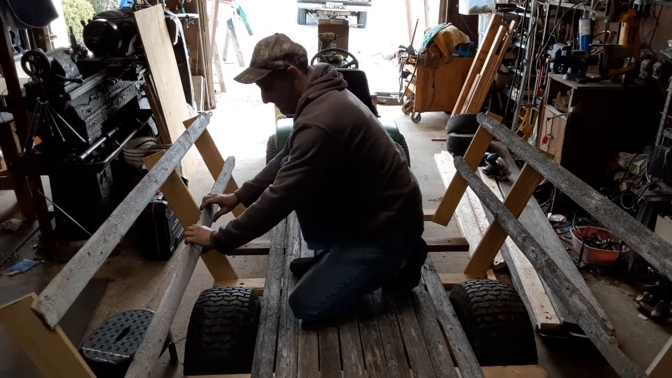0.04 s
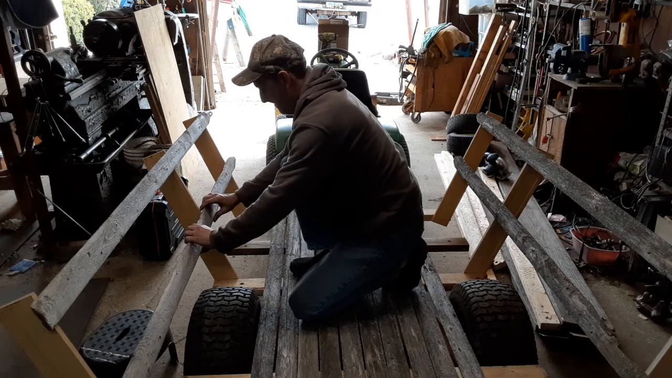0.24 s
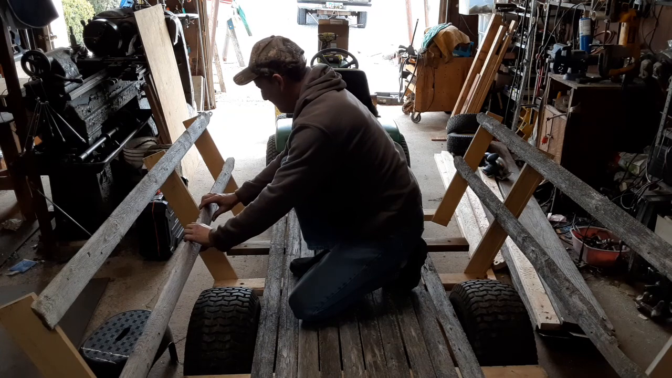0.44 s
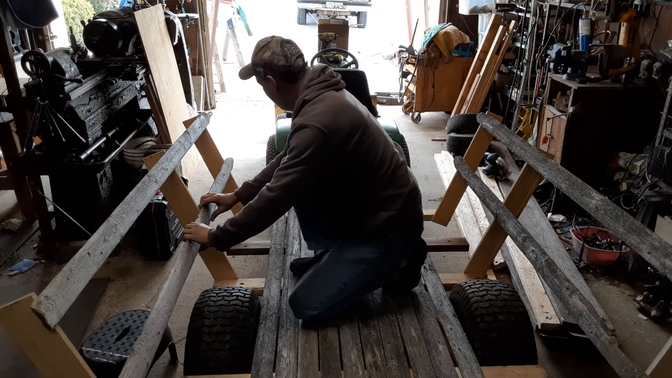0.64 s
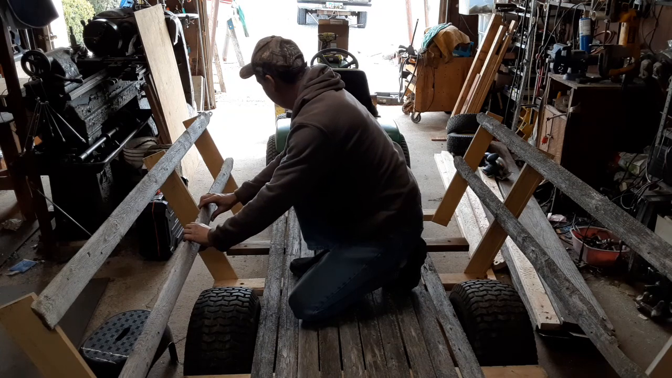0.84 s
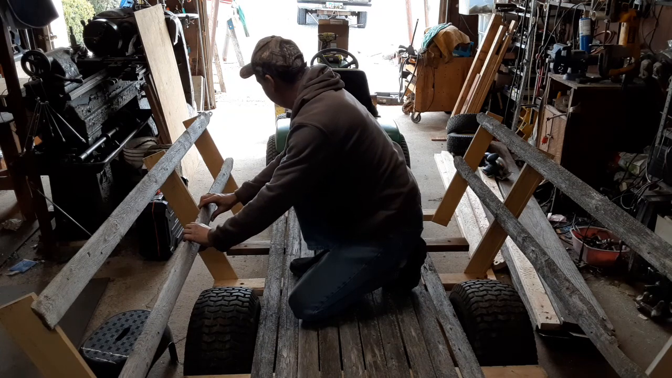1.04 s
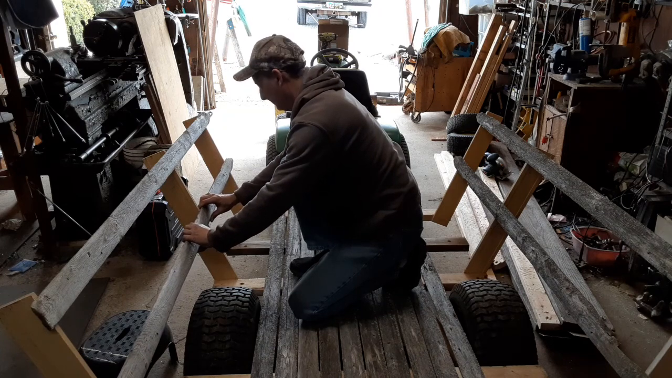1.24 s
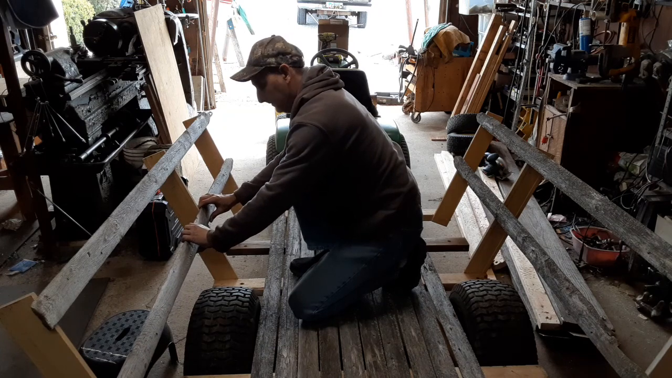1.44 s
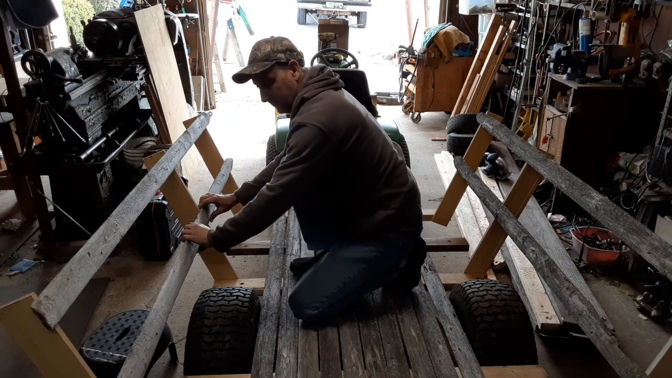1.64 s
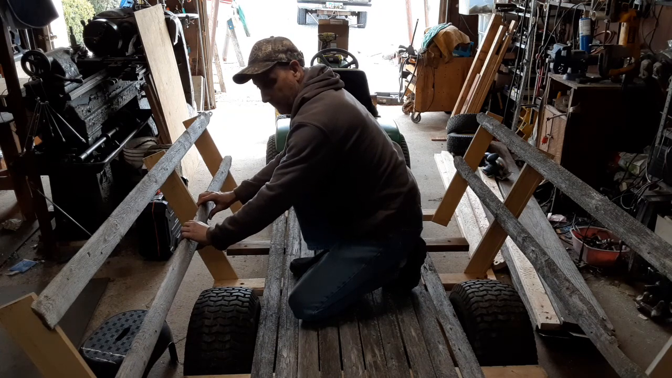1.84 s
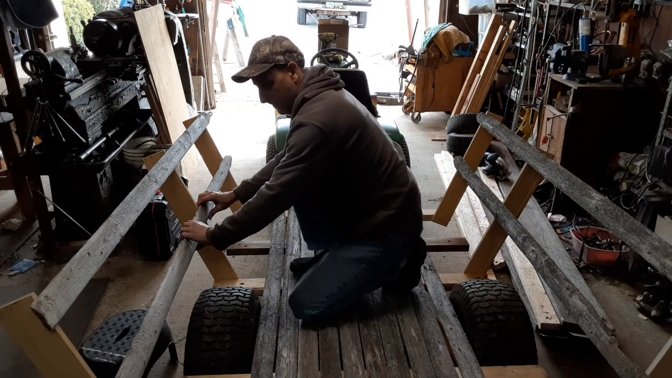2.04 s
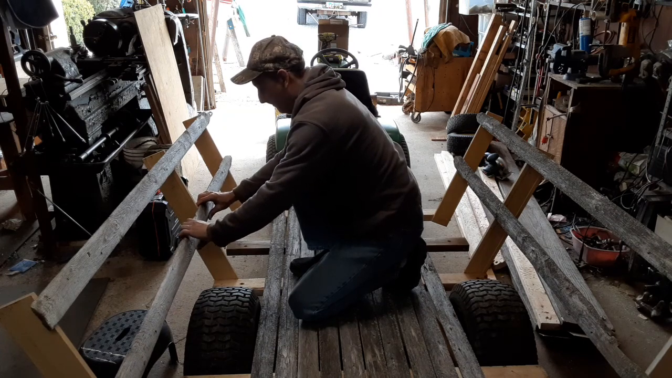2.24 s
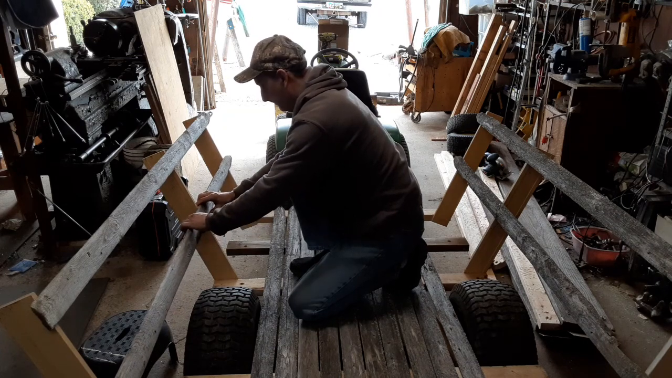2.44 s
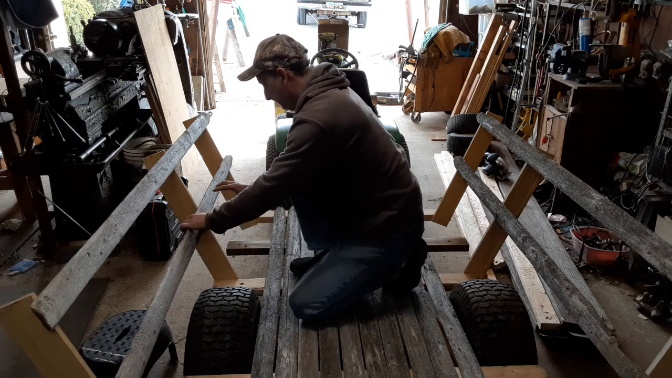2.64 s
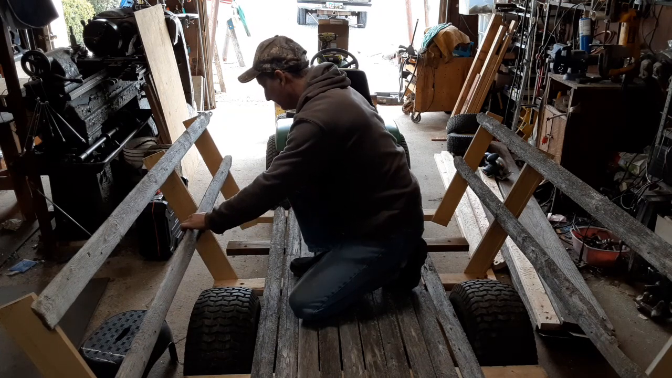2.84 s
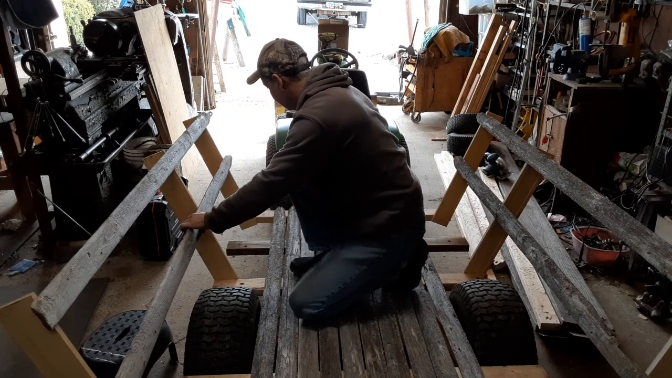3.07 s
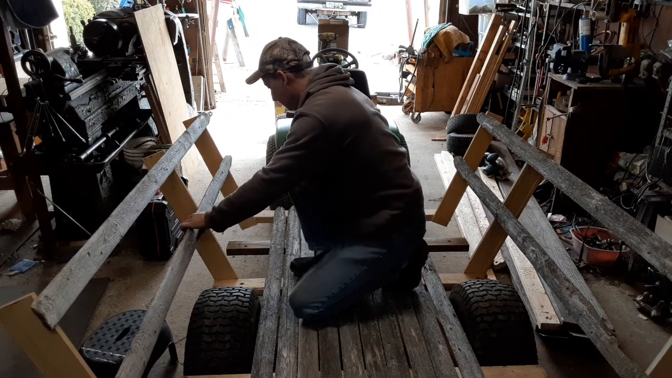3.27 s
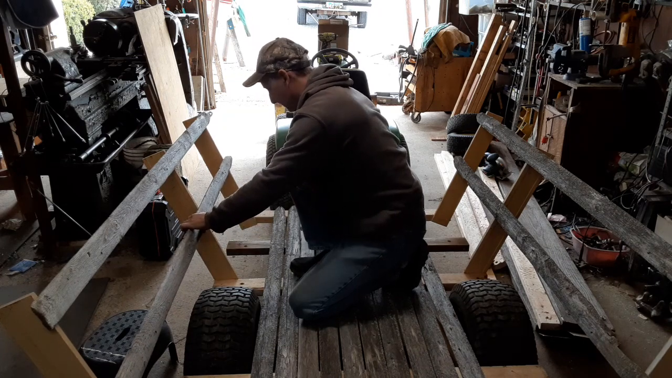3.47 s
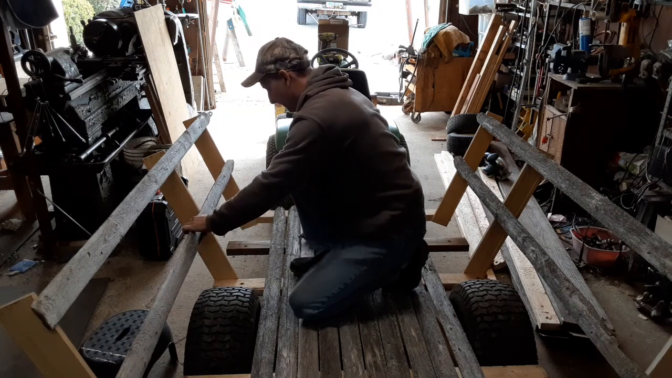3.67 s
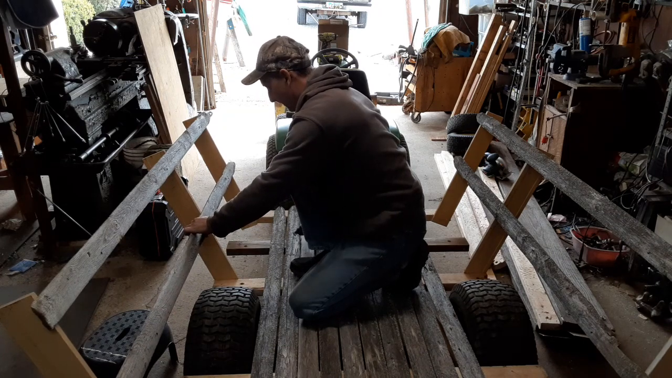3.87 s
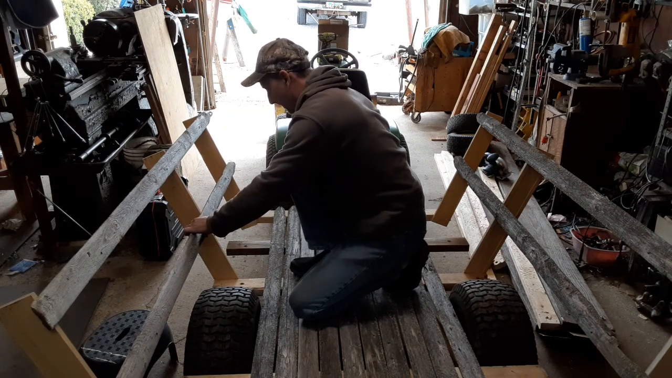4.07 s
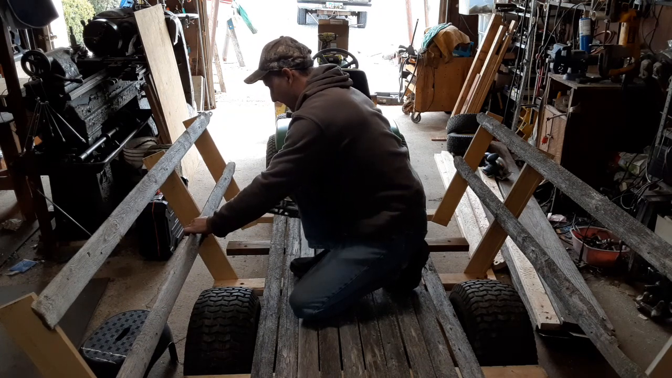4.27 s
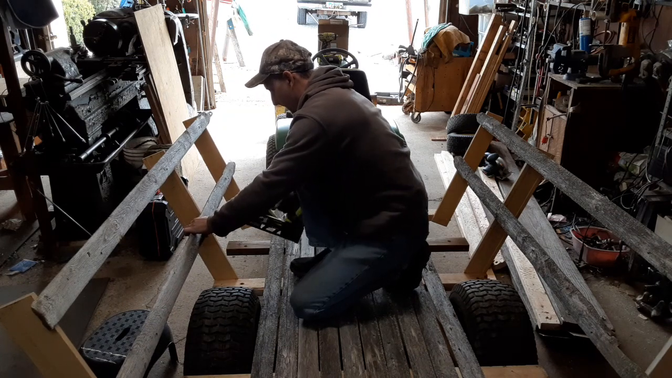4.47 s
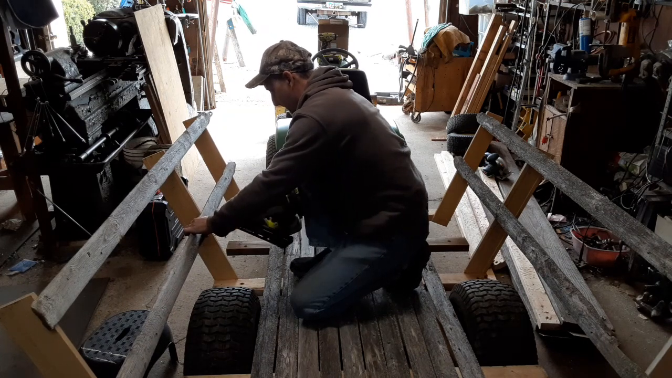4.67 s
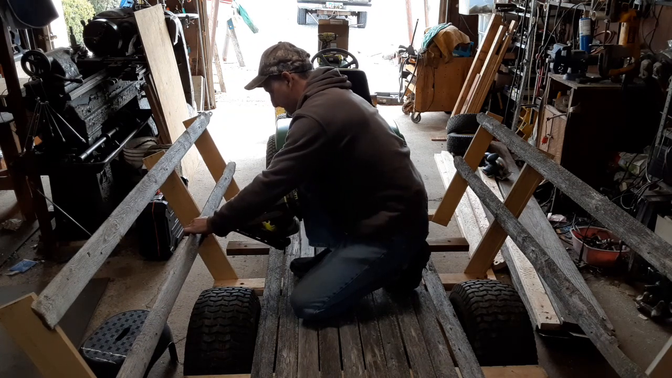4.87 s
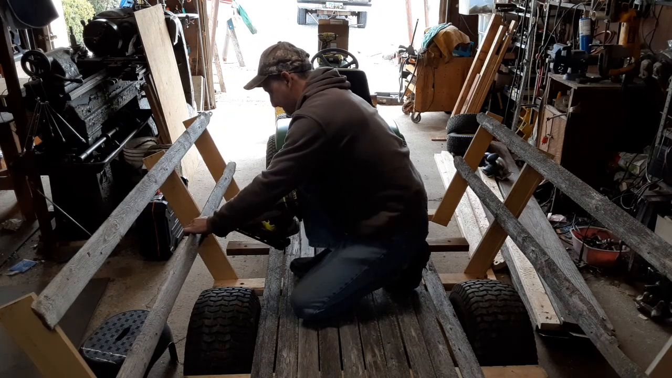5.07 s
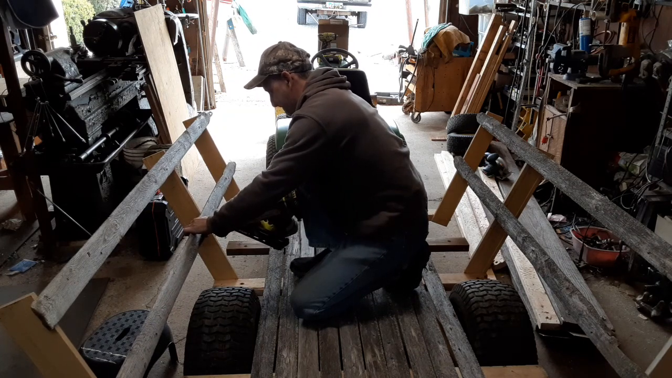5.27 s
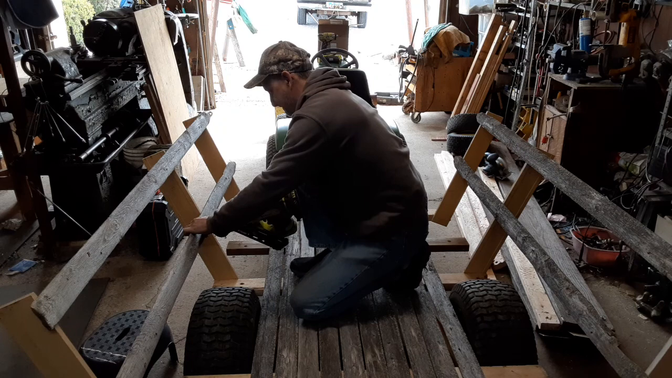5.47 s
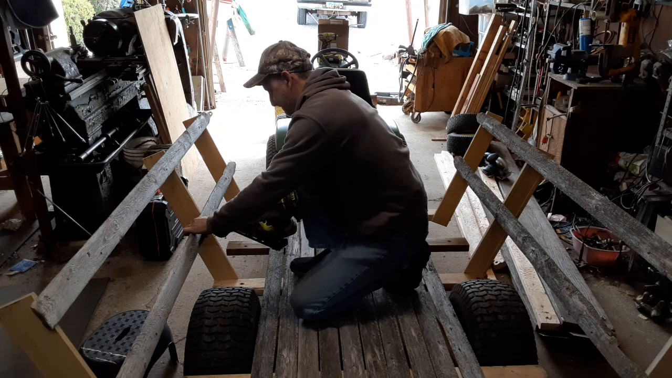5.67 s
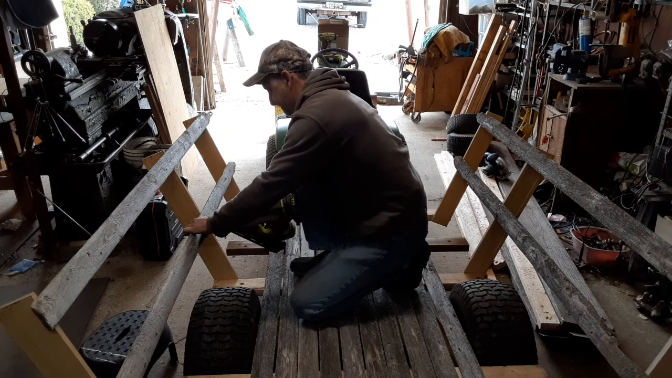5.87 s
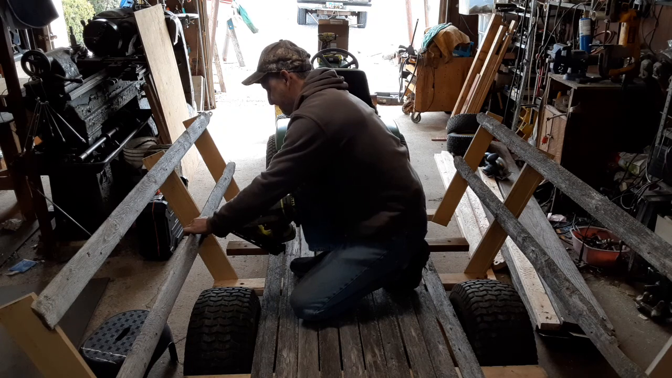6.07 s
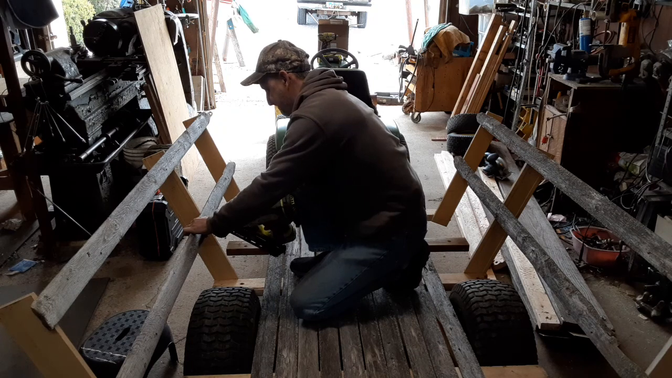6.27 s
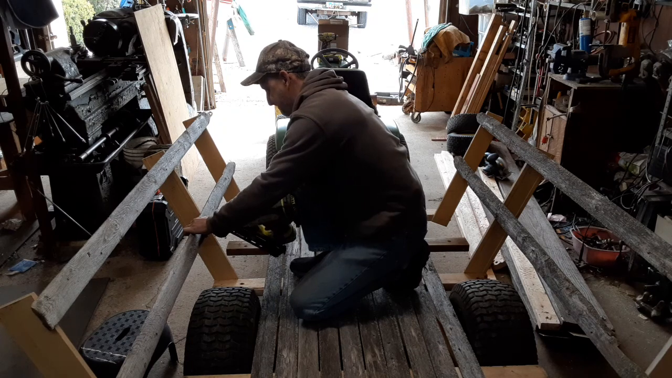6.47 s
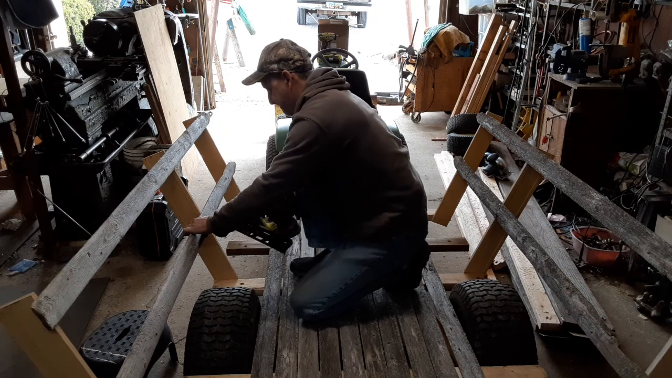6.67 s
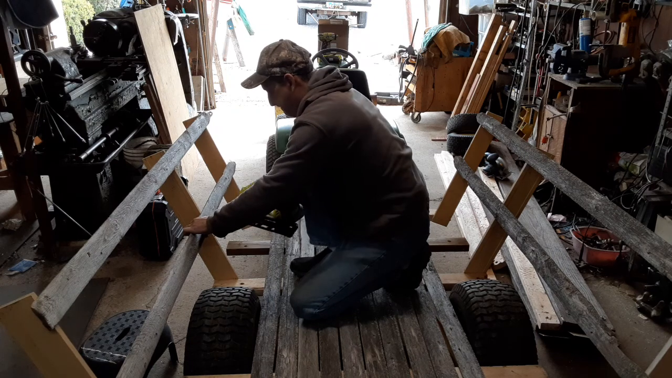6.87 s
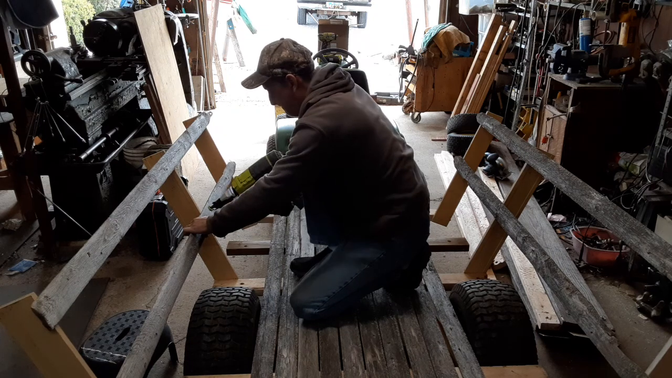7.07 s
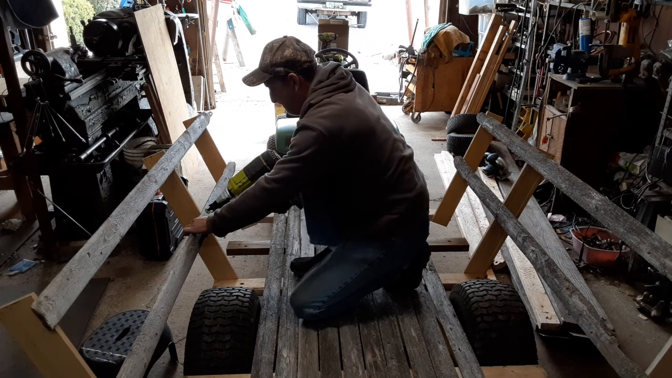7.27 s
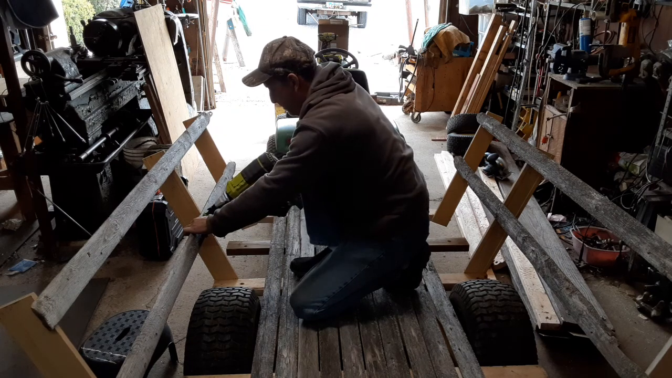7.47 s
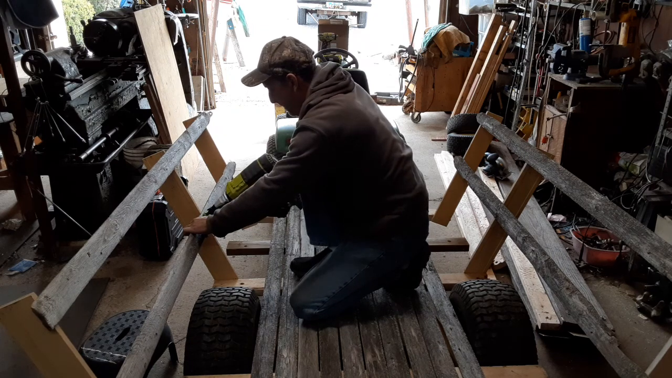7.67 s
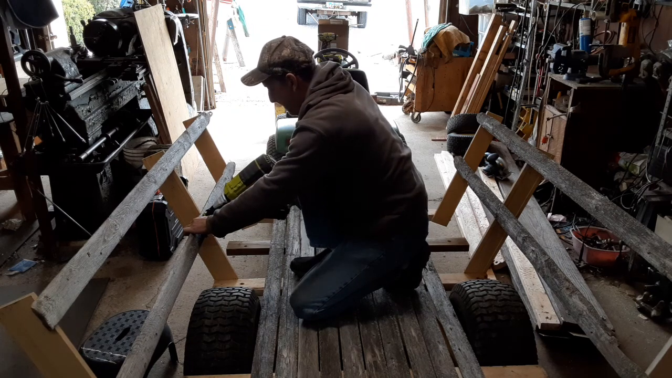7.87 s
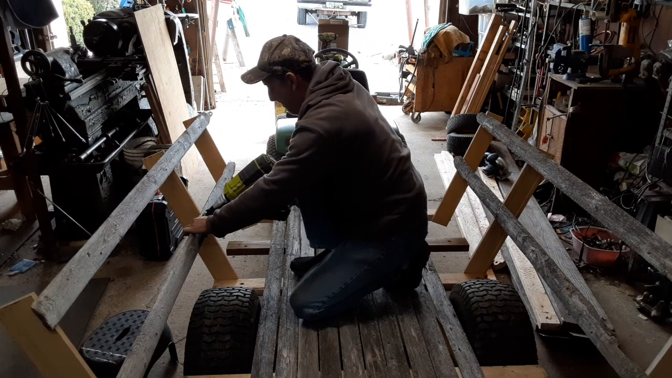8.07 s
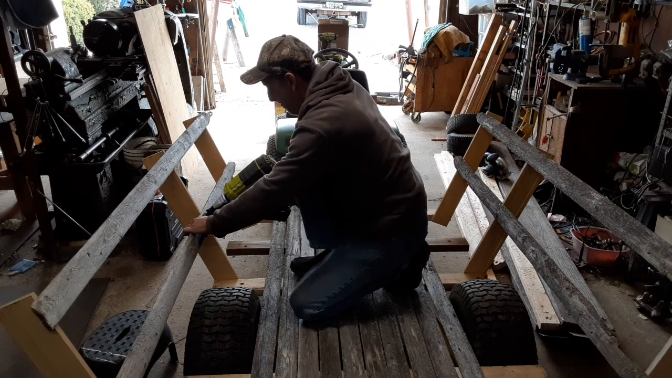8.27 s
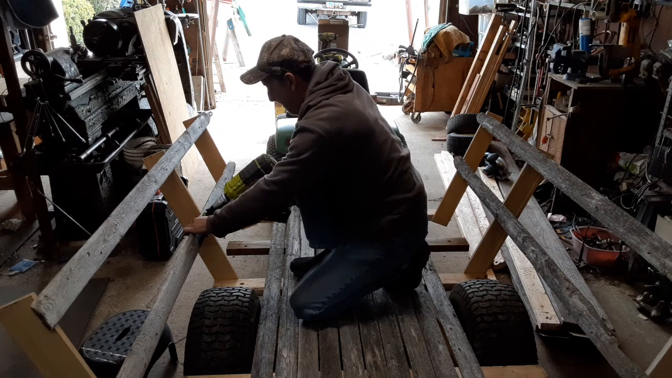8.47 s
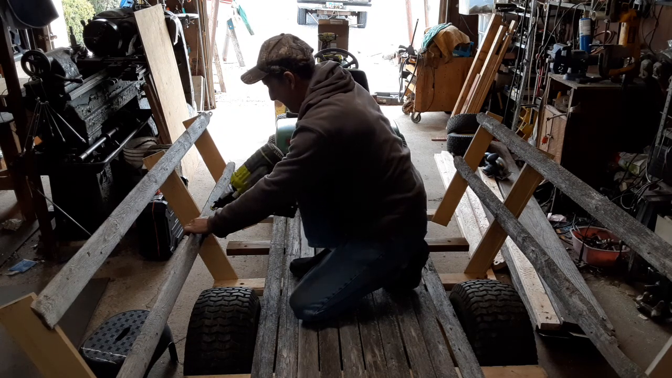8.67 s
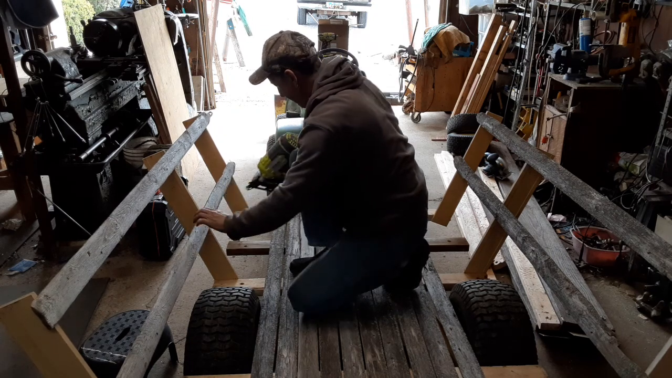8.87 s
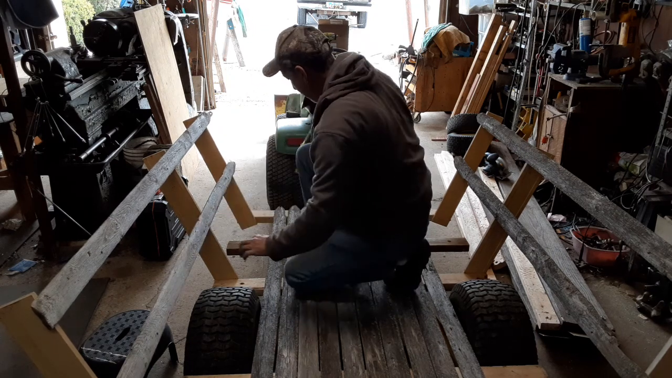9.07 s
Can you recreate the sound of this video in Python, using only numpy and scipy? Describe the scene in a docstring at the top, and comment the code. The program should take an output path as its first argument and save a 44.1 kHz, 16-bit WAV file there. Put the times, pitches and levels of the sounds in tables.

```python
"""A cordless nailer drives two brads: trigger clicks, motor wind-up, release, bang, return stroke and stop.
Modes of steel, boards and deck ring as decaying sines; cracks, clatter and gears are shaped noise and tones.
Before and between the shots a man kneeling on a wooden trailer deck in a garage shifts about: his clothes
rustle as swelling noise, and one bouncing bump knocks the deck. A low rumble lies beneath.
A gain control yields quickly to loud sound and is slow to come back."""
import sys
import numpy as np
from scipy import signal
from scipy.fft import rfft, irfft, next_fast_len
from scipy.io import wavfile
from scipy.ndimage import uniform_filter1d

SR = 44100
rng = np.random.default_rng(int(sys.argv[2]) if len(sys.argv) > 2 else 0)


def output_pcm(signal):
    """Save a mono or channel-first signal as 16-bit PCM at the path in sys.argv[1].

    Samples are clipped to [-1, 1] before scaling.
    """
    pcm = np.clip(np.atleast_2d(signal).T, -1, 1) * 32767
    wavfile.write(sys.argv[1], SR, np.round(pcm).astype(np.int16))


N = 401751
T = np.arange(N) / SR  # time [s]
EDGE_HZ = 15950  # upper band limit

# Moments of the firing cycle, counted from the bang [s]
MOTOR_ON_S, RELEASE_S, RETURN_S, BRAKE_S = -.335, -.008, .08, 0.286


def amp(db):
    """Decibel law: converts a level to an amplitude gain."""
    return 10 ** (np.asarray(db) / 20)


def evened(x):
    """Normalization: scales a signal to rms 1."""
    return x / np.sqrt(np.mean(x ** 2) + 1e-20)


def read(points, hz):
    """Logarithmic frequency scale: interpolates the points (Hz, value) along it."""
    f, value = np.transpose(points)
    return np.interp(np.log(hz + 1), np.log(f + 1), value)


def level(s, db):
    """Envelope: a gain through the points (s, dB), silent outside them."""
    gain = np.zeros(N)
    span = slice(*np.searchsorted(T, [s[0], s[-1]]))
    gain[span] = amp(np.interp(T[span], s, db))
    return gain


def add(mix, s, sound):
    """Superposition: adds a sound to the mix, starting at time s."""
    part = mix[round(s * SR):][:len(sound)]
    part += sound[:len(part)]


def wander(hz, size=N):
    """Random modulation: a slow signal of rms about 1, varying up to the given rate."""
    at = T[:size] * 2 * hz
    points = evened(rng.standard_normal(size // 8))
    # the factor restores the power that linear interpolation loses
    return np.sqrt(3 / 2) * np.interp(at, np.arange(len(points)), points)


# Likeness of the two channels in a diffuse field: (frequency [Hz], coherence [-1 to 1])
COHERENCE = [(60, 1), (130, 0.96), (290, 0.92), (640, 0.62), (1400, 0), (15000, 0)]


def diffuse(x, spectrum=None):
    """Spatial coherence: makes two unrelated signals alike only in the bass, as at two close microphones."""
    size = next_fast_len(x.shape[1])
    hz = np.fft.rfftfreq(size, 1 / SR)
    a, b = rfft(x, size)
    same = np.clip(read(COHERENCE, hz), -1, 1)
    z = np.array([a, same * a + np.sqrt(1 - same ** 2) * b]) * (hz < EDGE_HZ)
    if spectrum:
        z = z * amp(read(spectrum, hz))
    return irfft(z, size)[:, :x.shape[1]]


def noise(spectrum, grain_db=0, size=SR):
    """Granular noise: diffuse, of rms 1, from tiny impacts of uneven size; repeats after size samples."""
    grains = rng.standard_normal((2, size)) * amp(grain_db * wander(900, size))
    x = evened(diffuse(grains, spectrum))
    return np.tile(x, N // size + 1)[:, :N]


def ring(modes, blows, rise, rattle=0):
    """Modal vibration: each blow (s, dB) excites decaying sines; loose contacts jostle their phase [rad]."""
    t, out = T[:SR // 2], np.zeros(N)
    for s, db in blows:
        for hz, mode_db, t60 in modes:
            angle = 2 * np.pi * hz * t + rattle * wander(30, len(t))
            decay = amp(db + mode_db - 60 * t / t60)
            add(out, s, decay * np.sin(angle) * (1 - np.exp(-t / rise)))
    return out


def bursts(blows, hold, t60, rise=0.0008):
    """Impact envelope: each blow (s, dB) builds, holds for a moment and decays exponentially."""
    t, out = T[:SR], np.zeros(N)
    for s, db in blows:
        decay = amp(db - 60 * np.maximum(t - hold, 0) / t60)
        add(out, s, decay * (1 - np.exp(-t / rise)))
    return out


def each_shot(rows):
    """Periodic cycle: repeats rows (s from bang, dB, ..) per shot; those before it gain the wind-up level."""
    out = []
    for bang_s, windup_db, *_ in SHOTS:
        for delay, db, *rest in rows:
            out.append((bang_s + delay, db + windup_db * (delay < 0), *rest))
    return out


# Reverberation of the garage: (frequency [Hz], decay time t60 [s])
GARAGE_DECAY = [(80, 0.25), (300, 0.34), (1000, 0.35), (3500, 0.28), (7000, 0.23), (15000, 0.14)]


def garage(x, wet_db):
    """Reverberation: direct sound plus dense reflections off the clutter, each band decaying at its own rate."""
    hz, t, z = signal.stft(rng.standard_normal((2, SR // 2)), SR, nperseg=256)
    decay = amp(-60 * t / read(GARAGE_DECAY, hz)[:, None])
    tail = signal.istft(z * decay, SR, nperseg=256)[1]
    onset = np.clip(T[:tail.shape[1]] / 0.0025 - .5, 0, 1)  # the first reflections come a little late
    tail = diffuse(tail * onset)
    wet = signal.oaconvolve(np.atleast_2d(x), tail / np.linalg.norm(tail[0]), axes=1)[:, :N]
    return (x + amp(wet_db) * wet) / np.sqrt(1 + amp(wet_db) ** 2)


# Spectrum of the low background: (frequency [Hz], density [dB per Hz])
RUMBLE_SPECTRUM = [(20, -18), (38, -12.5), (52, -7.5), (63, 3.5), (85, 2.5), (130, -6.5), (200, -7),
                   (400, -11.5), (1000, -18.5), (4000, -37.5), (9000, -44), (15000, -30)]
# Slow swell of the low background: (time [s], level [dB])
RUMBLE_LEVEL = [(0, -54.5), (1, -56.5), (1.5, -52), (3.5, -51), (6, -54), (9.11, -48.5)]


def rumble():
    """Stationary noise under a slow envelope: the low background from beyond the open door."""
    return level(*np.transpose(RUMBLE_LEVEL)) * noise(RUMBLE_SPECTRUM, size=N)


# Spectrum of cloth friction: (frequency [Hz], density [dB per Hz])
CLOTH_SPECTRUM = [(40, -16), (120, 1), (300, 0), (600, 0.5), (1000, -0.5), (1600, -1.5), (2600, -2),
                  (4200, -6.5), (7000, -14), (11000, -17.5), (15500, -22.5)]
# Sleeves and hands sliding over wood, one row a movement, before the overall gains:
# (middle [s], length [s], level [dB], treble against that level [dB])
MOVEMENTS = [(0.143, 0.27, -49.5, 3), (0.467, 0.35, -48, -1), (1.276, 0.18, -54, 1.5),
             (1.532, 0.091, -44, -0.5), (1.736, .2, -43.5, 0.5), (2.206, 0.31, -46.5, 2.5),
             (2.605, 0.21, -42, 2), (2.867, 0.23, -44.5, 0.5), (3.124, 0.12, -47, -2.5),
             (3.353, 0.027, -42.5, -21), (3.563, 0.27, -37.5, 1), (3.923, 0.4, -46.5, 2.5),
             (4.21, 0.3, -49, 0), (4.601, 0.043, -34.5, 1), (4.506, 0.08, -50, 3.5),
             (4.654, 0.18, -44.5, 1), (4.92, 0.19, -47, 0), (5.336, 0.26, -49.5, 1),
             (5.56, 0.033, -51.5, 0), (5.88, 0.35, -44, 0), (5.953, 0.12, -39, -2.5), (7.18, 0.41, -50, -1),
             (7.506, 0.19, -43, -4), (7.954, 0.23, -41.5, -2.5), (9, 0.27, -52.5, 6)]


def rustle(gain_db=2.0, treble_db=1.0):
    """Stick-slip friction: fibres catch and slip; movements swell and fade, each with its own treble."""
    s, length, db, bright_db = np.transpose(MOVEMENTS)[:, :, None]
    t = T[::100]  # coarse time grid for the slow swells
    swells = amp(db + gain_db) / np.cosh(np.clip(2 * (t - s) / length, -20, 20))
    bright_swells = swells * amp(bright_db + treble_db)
    # unrelated movements add in power
    low, high = (np.interp(T, t, np.linalg.norm(g, axis=0)) for g in (swells, bright_swells))
    catching = amp(0.93 * wander(40) + .5 * wander(14))
    cloth = noise(CLOTH_SPECTRUM, grain_db=0.13, size=N) * catching
    body = uniform_filter1d(cloth, size=5)
    return low * body + high * (cloth - body)


# Dull knocks on the deck: (time [s], level [dB])
DECK_KNOCKS = [(3.7518, -29), (3.758, -17.5), (3.7868, -29.5), (3.801, -31)]
# Modes of the deck: (frequency [Hz], level [dB], t60 [s])
DECK_MODES = [(153, -12, 0.051), (212, -3, 0.12), (263, 9, 0.038), (325, -1, 0.06), (377, -2.5, 0.05),
              (517, -6, 0.024), (626, -11.5, 0.079)]


def knocks(scuff_db=-17):
    """Repeated impact: a soft, heavy bump bounces on the deck, scuffs it and excites its modes."""
    scuff_spectrum = [(60, -12), (400, 8), (1200, 5), (2300, -2), (5000, -26), (15000, -45)]
    scuff = bursts(DECK_KNOCKS, hold=0.0037, t60=0.11) * noise(scuff_spectrum)
    return amp(scuff_db) * scuff, ring(DECK_MODES, DECK_KNOCKS, rise=0.0021)


# Trigger and switch clicks, before the wind-up level: (time from the bang [s], level [dB])
TRIGGER_CLICKS = [(-.3467, -27.5), (-.32, -34)]
# Modes of the steel spring; the last row is a thin whistle of the motor controller:
# (frequency [Hz], level [dB], t60 [s])
CLICK_TONES = [(3720, -5, .05), (4230, -5.5, 0.041), (4550, -5, 0.022), (5820, -14.5, .02),
               (11680, -6.5, 0.025)]


def trigger(tick_db=-4):
    """Impulse excitation: a tiny tick, the ring of a steel spring and a thin whistle of the controller."""
    clicks = each_shot(TRIGGER_CLICKS)
    tick_spectrum = [(1000, -12), (4000, -1), (7000, -9.5), (15000, -2)]
    tick = amp(tick_db) * bursts(clicks, hold=0.0012, t60=0.012) * noise(tick_spectrum)
    return tick + ring(CLICK_TONES, clicks, rise=.0003)


CHOP_HZ = 3915  # rate of the current chopping
# Chopping as the motor starts and as it slows: (start from the bang [s], level [dB], length [s])
CHOPPING_SPANS = [(-.328, -35, .04), (.255, -29, .13)]
# Harmonics of the chopping: (multiple of its rate, level [dB])
CHOP_HARMONICS = [(1, -0.5), (2, -11.5), (3, -3), (4, -10.5)]


def controller(flutter=.25):
    """Magnetic excitation: current chopped by the controller makes the motor's windings whistle thinly."""
    out = np.zeros(N)
    for s, db, length in each_shot(CHOPPING_SPANS):
        t = T[:round(length * SR)]
        angle = 2 * np.pi * CHOP_HZ * t + flutter * wander(60, SR)[:len(t)]
        tone = sum(amp(order_db) * np.sin(k * angle) for k, order_db in CHOP_HARMONICS)
        add(out, s, amp(db) * np.hanning(len(t)) ** .5 * tone)
    return out


BOOM_STEEPNESS = 2.2  # exponent of the swell
# Booms as the motor starts and as it stops: (time from the bang [s], level [dB], swell [s])
HOUSING_BOOMS = [(-.316, -24.5, .024), (.303, -10.5, 0.02)]
# Modes of the housing: (frequency [Hz], level [dB])
HOUSING_MODES = [(200, 1), (410, -11), (620, -14.5)]


def booms(flutter=0.4):
    """Torque reaction: the motor twists the housing, whose hollow note swells, flutters and is gone."""
    t, out = T[:SR // 2], np.zeros(N)
    for s, db, swell in each_shot(HOUSING_BOOMS):
        tone = 0
        for hz, mode_db in HOUSING_MODES:
            tone = tone + amp(mode_db) * np.sin(2 * np.pi * hz * t + flutter * wander(40, len(t)))
        envelope = (t / swell * np.exp(1 - t / swell)) ** BOOM_STEEPNESS
        add(out, s, amp(db) * tone * envelope)
    return out


# The gear mesh spins up towards its free pitch and sags as the piston is loaded
MESH_HZ, SPIN_UP_S, SAG_HZ_PER_S = 1789, .021, 420
# The gear noise builds with the speed and grows with the load
GRIND_RISE_S, GRIND_DB_PER_S = 0.06, 16
# The gearbox resonance that the sagging mesh runs into
GEARBOX_HZ, GEARBOX_WIDTH_HZ = 1669, 41
FUZZ_RADIANS = .85  # how far the gear teeth jostle the phase of the fuzzy partials
# Spectrum of the loaded gears: (frequency [Hz], density [dB per Hz])
GEAR_SPECTRUM = [(60, -24), (200, -13), (450, -11), (620, -10.5), (780, -9.5), (1400, 0), (2300, 2),
                 (2900, -1.5), (3400, 0), (4200, -5), (7000, -8.5), (9500, -10.5), (15500, -13.5)]
# Fuzzy sidebands and overtones: (multiple of the mesh frequency, level against the gear noise [dB])
MESH_PARTIALS = [(0.354, -25.5), (.735, -20.5), (1.271, -17.5), (1.929, -9.5), (2, -8.5)]


def motor(whine_db=-16, gears_db=-19.0, left_db=3.5, flicker_db=2, let_go_s=.004):
    """Gear meshing near resonance: teeth whine and grind; as load slows them, the whine nears its peak."""
    whine, grind, fuzz = np.zeros(N), np.zeros(N), np.zeros(N)
    teeth = noise(GEAR_SPECTRUM, grain_db=2.0)
    t = T[:SR // 2]
    speed = 1 - np.exp(-t / SPIN_UP_S)
    sagging_hz = MESH_HZ - SAG_HZ_PER_S * t
    loaded = np.exp(-np.maximum(t + MOTOR_ON_S - RELEASE_S, 0) / let_go_s)
    effort = (1 - np.exp(-t / GRIND_RISE_S)) * loaded
    resonance = speed / np.hypot(1, 2 * (sagging_hz - GEARBOX_HZ) / GEARBOX_WIDTH_HZ)
    for bang_s, db, *_ in SHOTS:
        start = bang_s + MOTOR_ON_S
        mesh_hz = speed * sagging_hz * (1 + 0.003 * wander(80, len(t)))
        angle = 2 * np.pi * np.cumsum(mesh_hz) / SR
        flicker = amp(db + whine_db + flicker_db * wander(25, len(t)))
        add(whine, start, effort * resonance * np.sqrt(2) * np.sin(angle) * flicker)
        add(grind, start, effort * amp(db + gears_db + GRIND_DB_PER_S * t))
        for k, order_db in MESH_PARTIALS:
            fuzzy_angle = k * (angle + FUZZ_RADIANS * wander(80, len(t)))
            add(fuzz, start, speed ** 2 * amp(order_db) * np.sqrt(2) * np.sin(fuzzy_angle))
    return grind * (teeth + fuzz), whine * amp([[left_db], [-left_db]])


RELEASE_LENGTH_S = .0018  # the piston lets go with one short, hard jolt
# The gears take up and rebound, the piston starts to fly and the brake bites; before the wind-up level:
# (time from the bang [s], level [dB], frequency [Hz], length [s])
MECHANISM_JOLTS = [(-.3022, -4.5, 1248, .0023), (-.2995, -5.5, 900, .0013), (-.2925, -13.5, 1273, .006),
                   (-.288, -5.5, 1116, .0012), (-.005, -7.5, 704, 0.0024), (.2898, -6, 1020, 0.0043),
                   (.2905, -12, 2130, 0.0055)]


def jolts(shove_db=-19, shove_s=0.0014):
    """Transient force: each jolt is a windowed push of one to a dozen cycles and a slower shove."""
    push, u = np.zeros(N), T[:SR // 20] / shove_s
    shove = u * (2 - u) * np.exp(-u)
    releases = [(s + RELEASE_S, db, hz, RELEASE_LENGTH_S) for s, _, db, hz, *_ in SHOTS]
    for s, db, hz, length in each_shot(MECHANISM_JOLTS) + releases:
        t = np.arange(0, length, 1 / SR)
        add(push, s, amp(db) * np.sin(np.pi * t / length) * np.sin(2 * np.pi * hz * t))
        add(push, s, amp(db + shove_db) * shove)
    return push


RETURN_DB_PER_S, BRAKE_DB_PER_S = 36, 330  # growth of the return stroke, and fall under the brake
# Spectrum of the unloaded gears: (frequency [Hz], density [dB per Hz])
COAST_SPECTRUM = [(100, -15), (300, 2), (700, -2), (1800, -3.5), (2350, 5.5), (2700, 1.5), (3500, -0.5),
                  (3950, -2), (4500, -3.5), (6000, -8), (12000, -6), (15500, -11)]


def return_stroke(top_db=-19):
    """Unloaded gear noise: after a shot the gears run on, growing louder until the brake bites."""
    gain = np.zeros(N)
    t = T[:SR // 2] + RETURN_S - BRAKE_S  # zero at the brake
    for bang_s, *_ in SHOTS:
        add(gain, bang_s + RETURN_S, amp(top_db + np.minimum(RETURN_DB_PER_S * t, -BRAKE_DB_PER_S * t)))
    return gain * noise(COAST_SPECTRUM, grain_db=3.5)


# Clacks of the returning piston, the last at its end stop: (time from the bang [s], level [dB])
PISTON_CLACKS = [(.222, -21), (.2885, -14), (.3248, -4.5)]
# Clacks of the tool in the hand: (time [s], level [dB])
HANDLING_CLACKS = [(8.911, -36.5), (9.057, -38)]
# Spectrum of a clack: (frequency [Hz], density [dB per Hz])
CLACK_SPECTRUM = [(80, -9), (250, 2.5), (600, 1.5), (1100, 2.5), (2300, 0), (4000, 2.5), (6500, -8.5),
                  (15500, -9.5)]


def clacks():
    """Hard contact: plastic and steel meet in short broadband bursts."""
    blows = each_shot(PISTON_CLACKS) + HANDLING_CLACKS
    return bursts(blows, hold=0.0029, t60=0.071, rise=.0007) * noise(CLACK_SPECTRUM, grain_db=3.0)


# One row a brad, before the layer gains: (time of the bang [s], wind-up [dB], release [dB],
# release frequency [Hz], crack [dB], clatter [dB], board ring [dB])
SHOTS = [(6.5115, -2, 8.5, 980, 2, -1, -3.5), (8.3931, 5, 9, 713, 3, 1.5, -1.5)]
# Spectrum of the crack: (frequency [Hz], density [dB per Hz])
CRACK_SPECTRUM = [(30, -26), (70, -6.5), (115, 0), (250, -4), (700, 5), (1400, 6.5), (2200, 7), (3200, -4),
                  (6000, -8.5), (12000, -5.5), (15500, -11.5)]
# Spectrum of the clatter: (frequency [Hz], density [dB per Hz])
CLATTER_SPECTRUM = [(30, -22), (70, -8.5), (130, -1.5), (340, 11), (470, -1), (650, 10.5), (1000, -9),
                    (1500, 10), (2000, -3), (2900, 4), (4500, -1), (7000, -4), (15500, -11)]
# Low tones of the air puff on the microphones: (frequency [Hz], level [dB], t60 [s])
PUFF_TONES = [(92, 4, 0.073), (170.2, 1.5, 0.073)]
# Modes of the nailed boards: (frequency [Hz], level [dB], t60 [s])
BOARD_MODES = [(202, -9.5, .14), (286, -3.5, 0.33), (340, -3.5, 0.36), (355, -4, 0.36), (587, -9, 0.53),
               (660, -7, 0.47), (730, -7.5, 0.36), (951, -9.5, 0.44), (1164, -10.5, 0.27),
               (1494, -4.5, 0.29), (1500, -6, .2), (2095, -15, 0.096), (2360, -12, .33),
               (3080, -12.5, 0.17)]


def shots(crack_gain_db=5, clatter_gain_db=-1, puff_db=-5, puff_left_db=3.5):
    """Impact and recoil: driver cracks on brad, tool clatters, air puff thumps the microphones, boards ring."""
    s, *_, crack_db, clatter_db, board_db = np.transpose(SHOTS)
    crack = bursts(zip(s, crack_db + crack_gain_db), hold=0.0035, t60=0.025)
    crack = crack * noise(CRACK_SPECTRUM, grain_db=-0.5)
    clatter = bursts(zip(s, clatter_db + clatter_gain_db), hold=0.041, t60=0.23)
    clatter = clatter * noise(CLATTER_SPECTRUM, grain_db=2)
    puff_blows = list(zip(s + RELEASE_S, board_db + puff_db))  # starts with the piston
    # each channel flutters on its own
    puff = np.array([ring(PUFF_TONES, puff_blows, rise=0.0028, rattle=.6) for _ in range(2)])
    boards = ring(BOARD_MODES, zip(s, board_db), rise=0.012, rattle=.95)
    return crack + clatter + boards, puff * amp([[puff_left_db], [-puff_left_db]])


def scene(treble_right_db=1.2):
    """Direct and diffuse fields: rattles and snaps scatter in the garage; tones and booms come more directly."""
    rattles, tones = zip(motor(), shots(), knocks())
    snaps = trigger() + controller() + jolts() + return_stroke() + clacks()
    scattered = garage(sum(rattles) + snaps, wet_db=-1.5)
    dull = uniform_filter1d(scattered, size=3)
    # the treble leans right
    scattered = dull + (scattered - dull) * amp([[-treble_right_db], [treble_right_db]])
    return scattered + garage(sum(tones) + booms(), wet_db=-5.5) + rustle() + rumble()


def record(dry, threshold_db=-25, ratio=2.54, attack=0.018, recovery_db_per_s=0.13):
    """Compression: bass cut, gain control with quick fall and slow recovery, soft overload, band limit."""
    dry = signal.sosfilt(signal.butter(4, 48, "highpass", fs=SR, output="sos"), dry)
    r = np.exp(-1 / (attack * SR))  # attack [s]
    power_db = 10 * np.log10(signal.lfilter([1 - r], [1, -r], (dry ** 2).mean(0)) + 1e-12)
    # the held level jumps to each peak, then sinks at the recovery rate
    held_db = np.maximum.accumulate(power_db + recovery_db_per_s * T) - recovery_db_per_s * T
    ducked = dry * amp(-np.maximum(held_db - threshold_db, 0) * (1 - 1 / ratio))
    edge = signal.firwin(511, EDGE_HZ, window=("kaiser", 9), fs=SR)
    return signal.oaconvolve(np.tanh(ducked), edge[None], "same", axes=1)


dry = scene()
out = record(dry)
output_pcm(out)
```